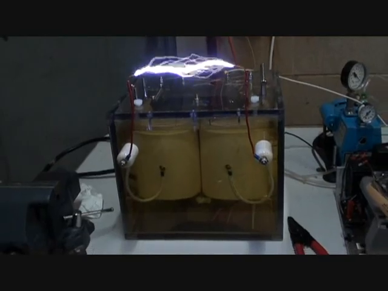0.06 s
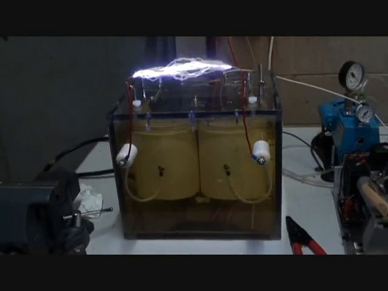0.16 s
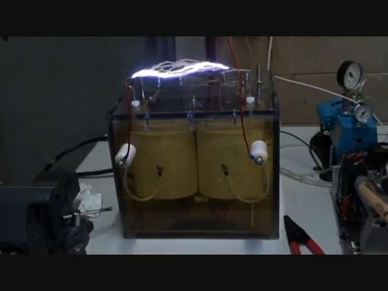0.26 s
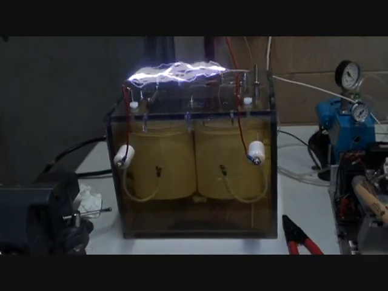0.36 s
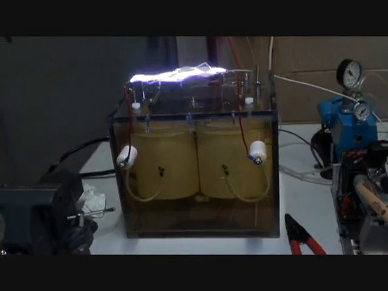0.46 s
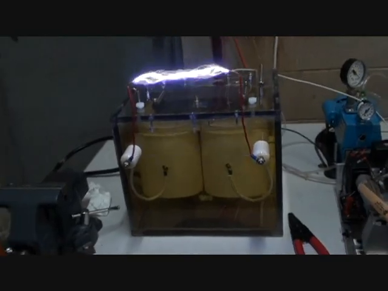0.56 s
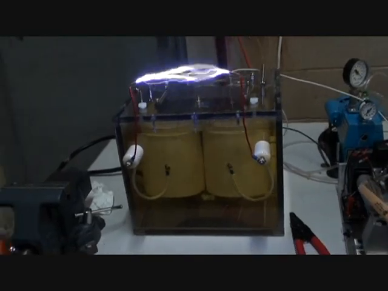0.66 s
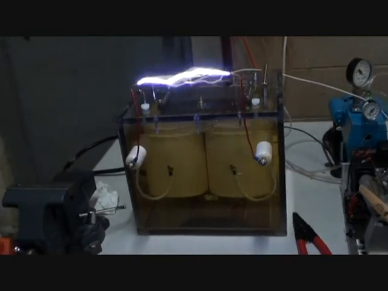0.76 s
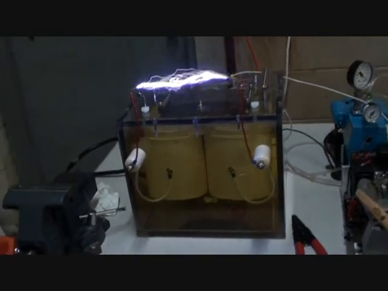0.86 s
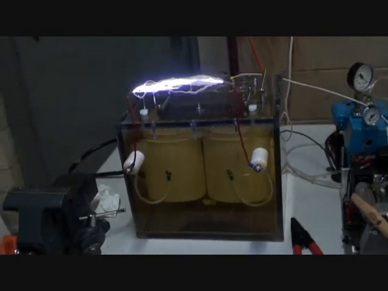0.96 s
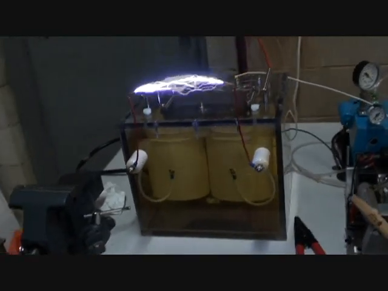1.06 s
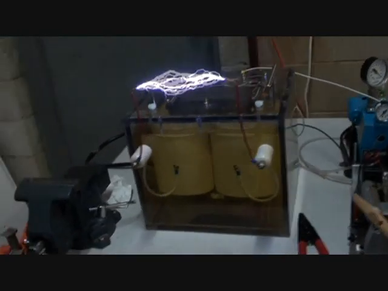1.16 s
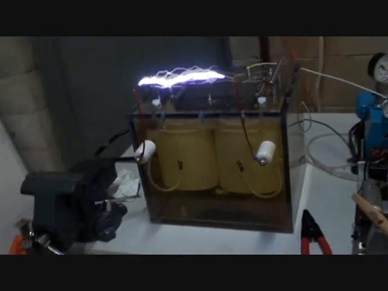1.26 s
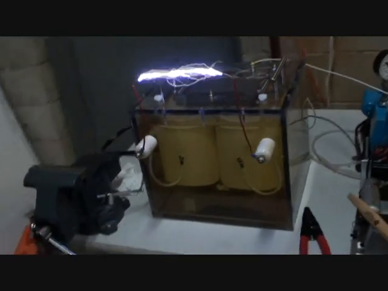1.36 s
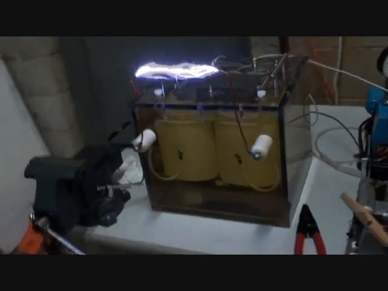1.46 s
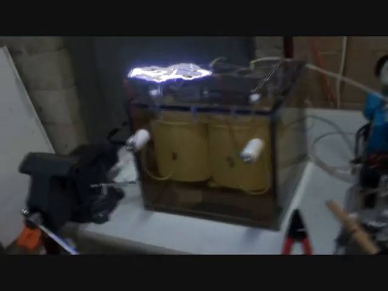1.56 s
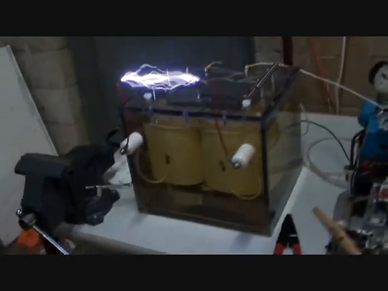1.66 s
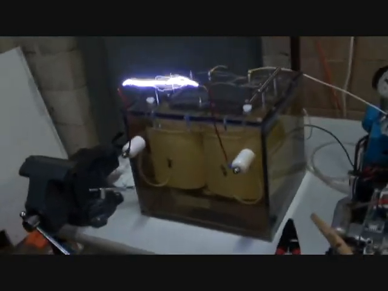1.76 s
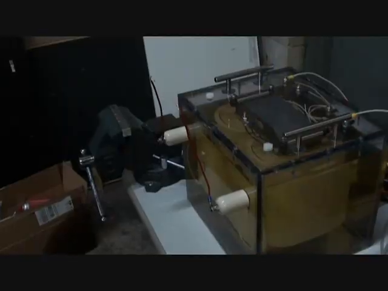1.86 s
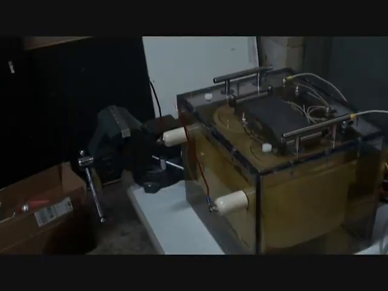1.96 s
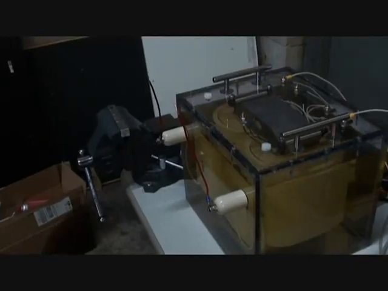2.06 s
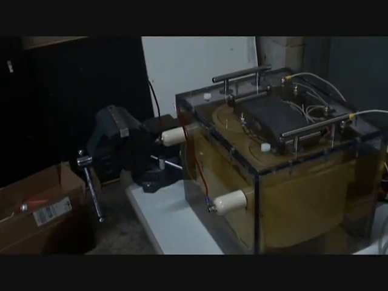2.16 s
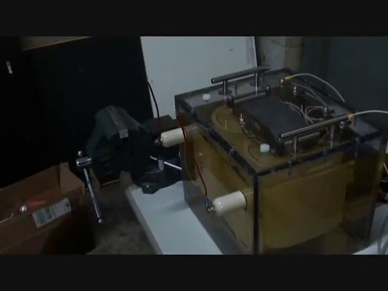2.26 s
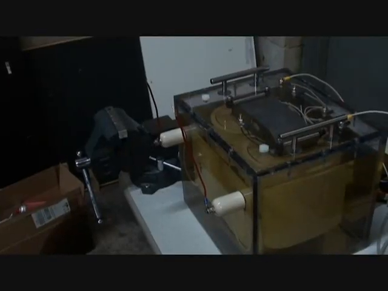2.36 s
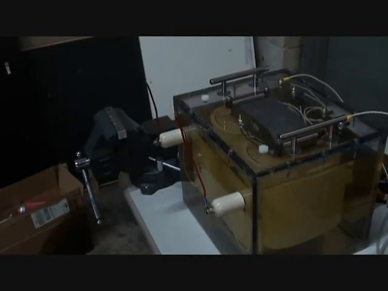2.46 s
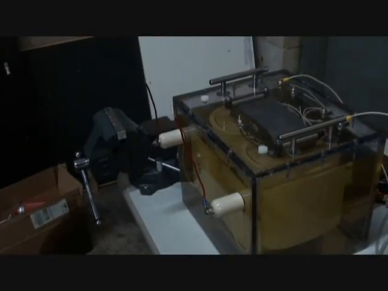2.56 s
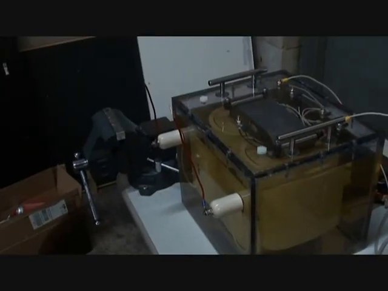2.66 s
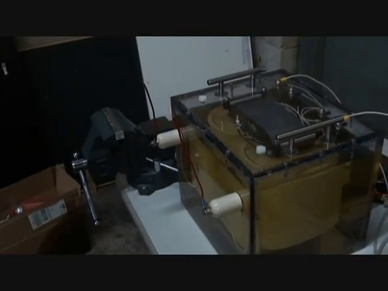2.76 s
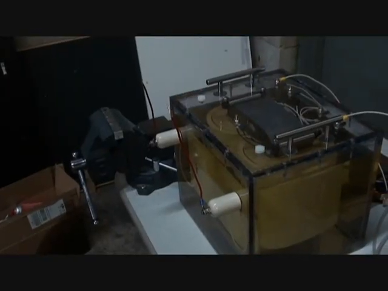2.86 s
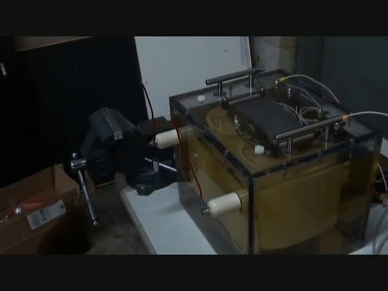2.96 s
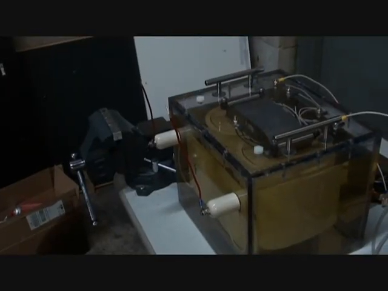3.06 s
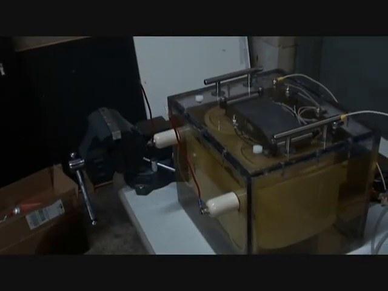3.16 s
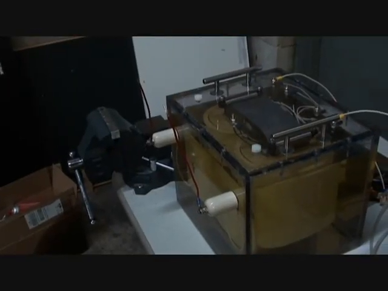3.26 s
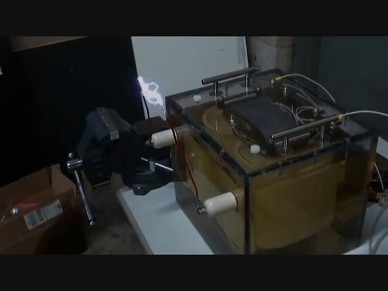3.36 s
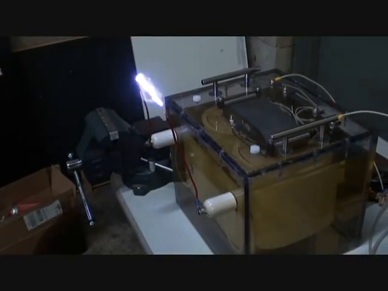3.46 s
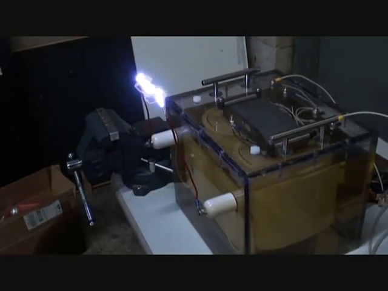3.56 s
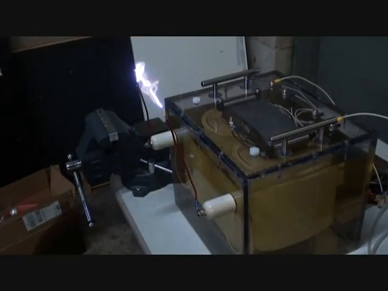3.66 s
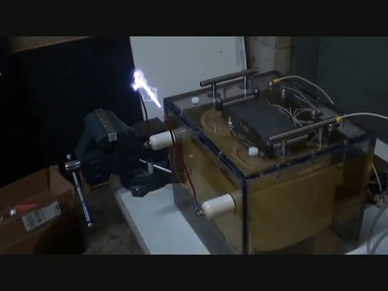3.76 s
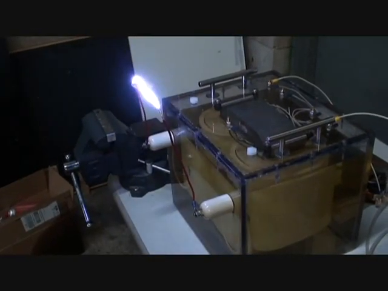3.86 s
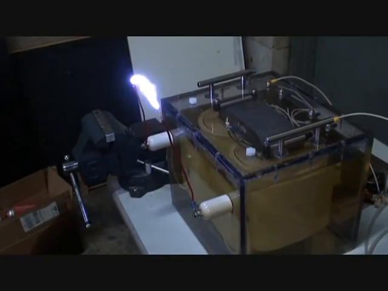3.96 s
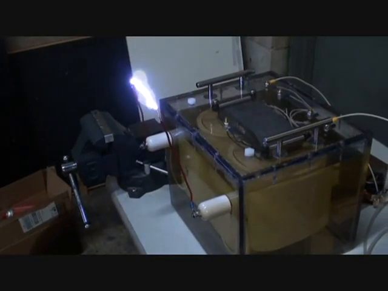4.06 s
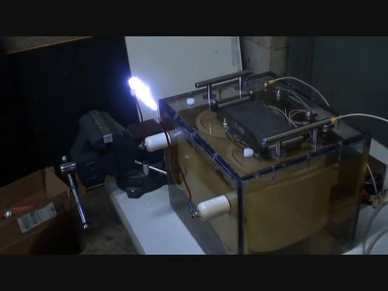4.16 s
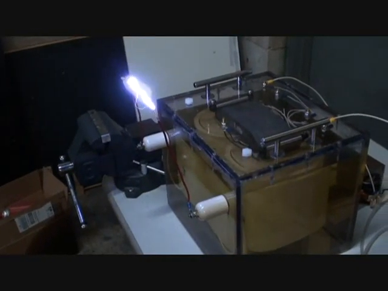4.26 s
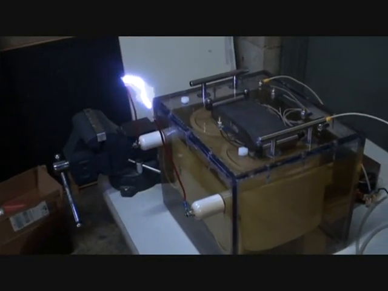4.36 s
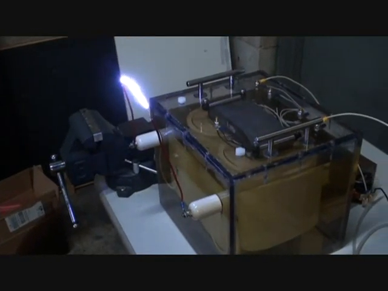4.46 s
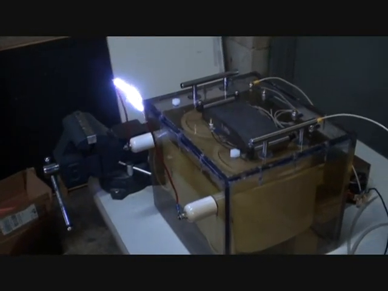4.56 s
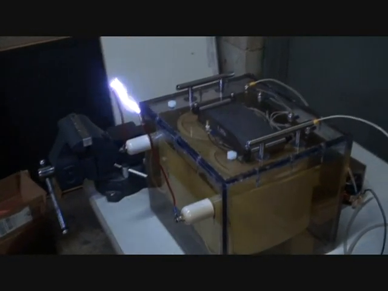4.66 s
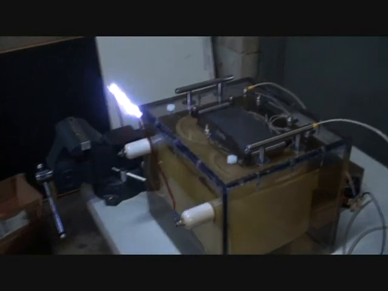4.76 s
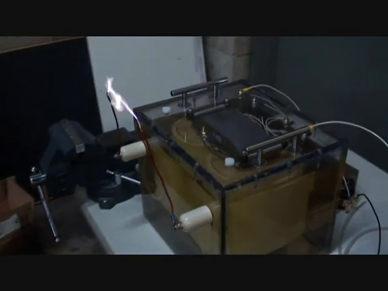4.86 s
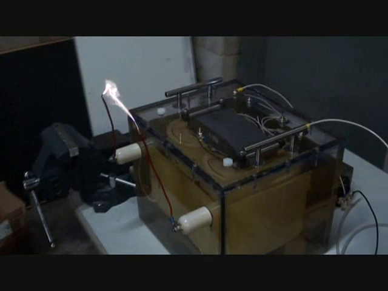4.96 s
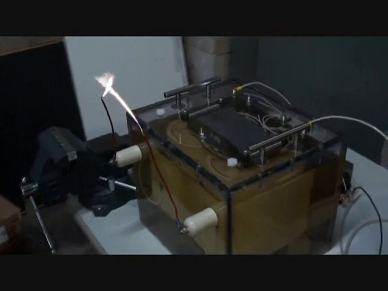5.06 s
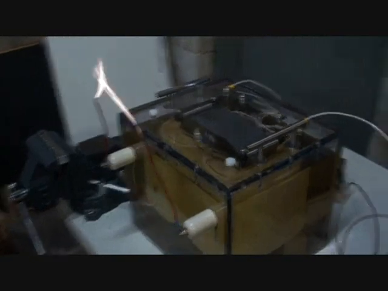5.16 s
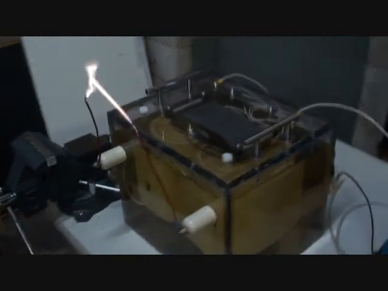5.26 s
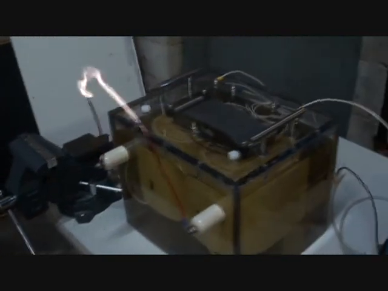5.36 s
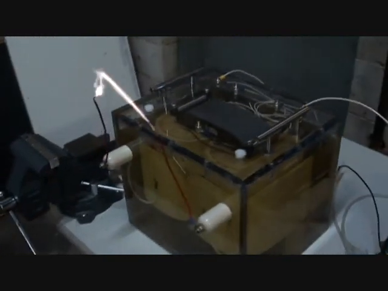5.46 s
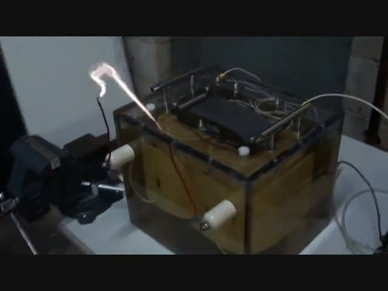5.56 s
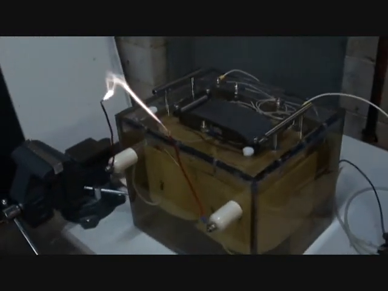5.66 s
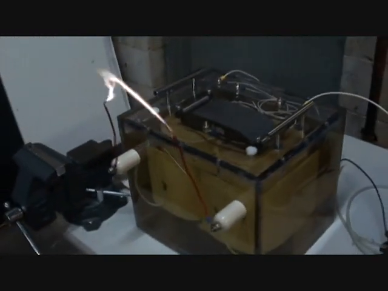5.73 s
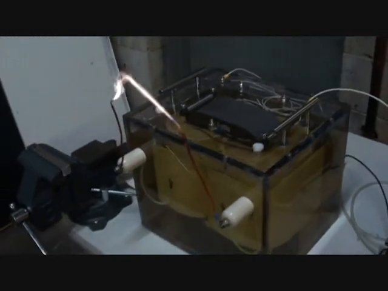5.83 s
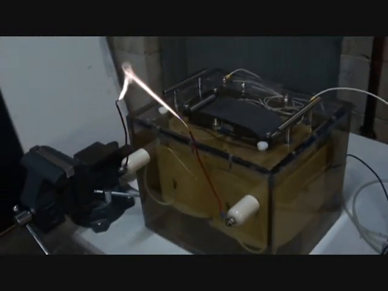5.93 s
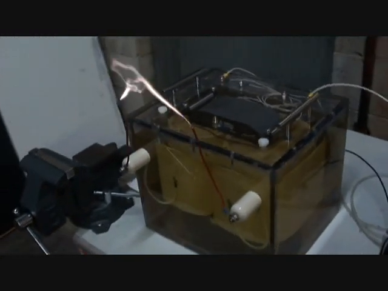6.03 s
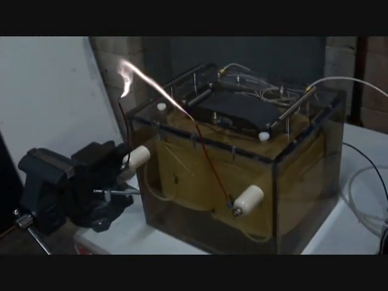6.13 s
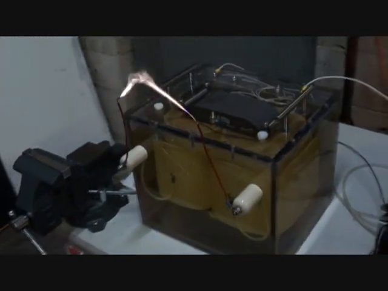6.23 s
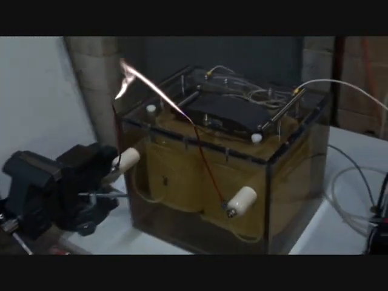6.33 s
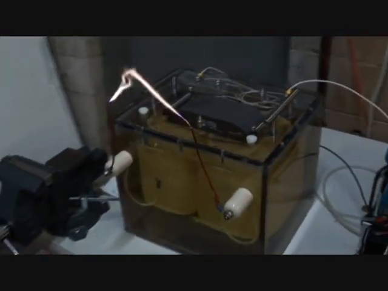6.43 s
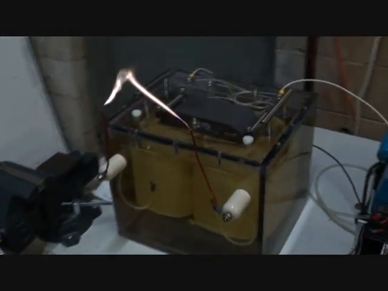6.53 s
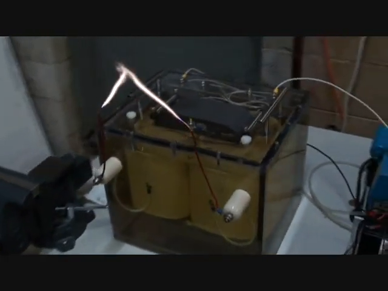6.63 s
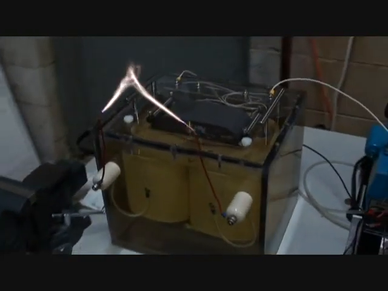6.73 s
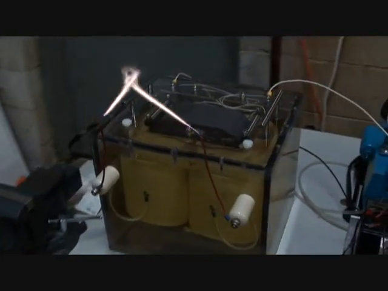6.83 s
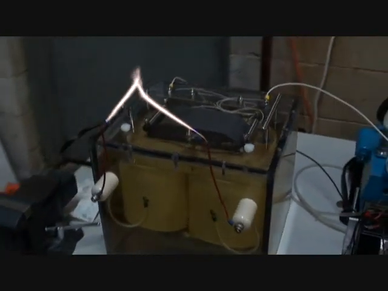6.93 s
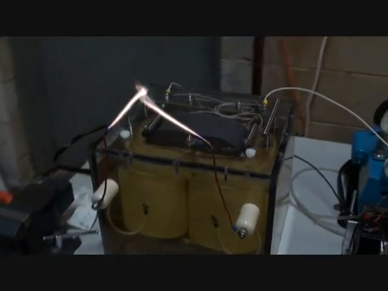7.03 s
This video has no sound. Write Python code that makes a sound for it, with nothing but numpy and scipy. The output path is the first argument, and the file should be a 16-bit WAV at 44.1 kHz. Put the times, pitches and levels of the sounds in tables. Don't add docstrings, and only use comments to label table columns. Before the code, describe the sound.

A harsh high-voltage arc buzzes with handling creaks, cuts to faint hiss and hum, then returns as a throbbing buzz settling into steady mains-rate snapping.

```python
import sys
import numpy as np
from scipy import signal
from scipy.fft import rfft, irfft, next_fast_len
from scipy.io import wavfile

SR = 44100
rng = np.random.default_rng(int(sys.argv[2]) if len(sys.argv) > 2 else 0)


def generate_wav(sig):
    pcm = np.round(np.clip(np.atleast_2d(sig).T, -1, 1) * 32767).astype(np.int16)
    wavfile.write(sys.argv[1], SR, pcm)


def makeup_ratio(level_db):
    decades = np.asarray(level_db, float) / 20
    return 10 ** decades


N = 312669
TIME, SIZE = np.arange(N) / SR, next_fast_len(N)
MAINS_HZ = 60.0
FLAME_LIGHTS_S, FLAME_LIT_S = 4.9, 5.01

CUTS = (1.9135, 3.4876)
# time_s, level_db
LONG_ARC = [
    (0.0, -10),
    (0.95, -12),
    (1.91, -14.5),
]
# time_s, level_db
CORONA = [
    (1.91, -33.5),
    (2.55, -31.5),
    (2.93, -27),
    (3.17, -28),
    (3.49, -28.5),
]
# time_s, level_db
SHORT_ARC = [
    (3.488, -13.5),
    (3.52, -15.5),
    (4.92, -17),
    (4.99, -31.5),
    (5.2, -49),
]
# time_s, level_db
FLAME = [(4.94, -38), (5.03, -41), (5.12, -44.5), (5.25, -42), (5.5, -39), (5.95, -38), (6.2, -34.5),
         (6.27, -31.5), (6.6, -30), (6.8, -28), (7.09, -27)]
# pitch_hz, level_db
LONG_COLOUR = [(410, -37.0), (700, -22), (1020, -20.5), (1160, -17), (1260, -16.0), (1950, -11),
               (3370, -11.5), (4090, -8), (5450, -8.0), (6450, -1.5), (7160, 2.5), (11700, -5),
               (15600, -16)][:-2] + [(16500, -11)]
# pitch_hz, level_db
CORONA_COLOUR = [(1180, -29.5), (2000, -15.0), (2950, -14.5), (3160, -14.0), (4320, -13.5), (5130, -14.5),
                 (7910, 0), (12300, -5.5), (15000, -8.5), (15800, -13)][:-2] + [(16500, -13.0)]
# pitch_hz, level_db
SHORT_COLOUR = [(350, -55), (600, -39), (652, -22), (768, -21.5), (834, -20), (997, -21), (1610, -15),
                (2870, -5.5), (5400, -7.5), (6400, 0), (7600, 3), (9360, 0.5), (11500, -3.5), (15100, -9.5),
                (16000, -12.5)]
# pitch_hz, level_db
FLAME_COLOUR = [(590, -56), (1000, -40), (1250, -23), (1560, -10), (2130, -11.5), (2600, -7), (3100, -9),
                (3750, -5), (4400, -10), (5000, -6.5), (5800, -5), (8260, 0), (16000, -20.5)]
# pitch_hz, level_db
RESTRIKE_COLOUR = [(1200, -19), (3000, -3), (3800, 0.5), (4400, 1.5), (5000, 3), (6000, -3), (8000, 0),
                   (11000, -1), (14000, 1)]
# pitch_hz, level_db
STREAMER_COLOUR = [(500, -30), (900, 5), (3500, -3), (8000, -4), (16000, -9)]
# mains_multiple, level_db
CORE_HUM = [
    [(2, 8), (4, -12)],
    [(1, -6), (2, -0.5), (3, -14), (4, 3.5), (5, -13), (6, -14)],
    [(1, -22.5), (2, -2), (3, -15.5), (4, 1), (5, -19), (6, -7), (7, -7.5), (8, -7), (9, -23), (10, -5),
     (11, -18), (12, -10.5), (13, -22), (14, -13.5), (15, -23), (16, -18.5), (17, -24), (18, -20),
     (19, -23), (20, -13), (21, -20), (22, -18), (24, -18), (26, -10), (28, -19), (30, -11), (32, -11)],
]
# hum_db, rumble_db, drift_db_per_s
BENCH = [
    (-59, -43.5, -6),
    (-50, -38, 1),
    (-60.5, -49.5, -3),
]
# pitch_hz, level_db
RUMBLE = [
    [(15, -55), (25, -37), (48, -23), (170, 1), (377, -2.5), (677, -6), (775, 0.5), (900, -7), (1170, -27),
     (1980, -120)],
    [(15, -43), (25, -27), (49, -8), (85, 1.5), (135, -1.5), (210, -13), (293, -1.5), (327, -8), (446, -6),
     (812, -8), (2060, -19.5), (2750, -23.5), (4580, -17.5), (5000, -16), (6500, -58), (11000, -120)],
    [(15, -36), (25, -38), (118, -7.5), (193, -18.0), (350, -10.0), (423, -11.0), (599, -7.5), (800, -15),
     (1040, -7), (1760, -120)][:-2] + [(1000, -16), (1500, -14), (2200, -25.5)],
]
# pitch_hz, width_hz, level_db
FAN = [(121, 8, -6), (148.4, 5.7, 3.5), (184, 18, -1.5), (353, 15, -6)]
# start_s, peak_db
KNOCKS = [(0.21, -21), (0.232, -41), (0.258, -28), (0.282, -27), (0.309, -18.5), (0.318, -15.5),
          (0.334, -27), (0.343, -22), (0.377, -30), (0.392, -40), (0.427, -20), (0.459, -25), (0.491, -30),
          (0.567, -34), (0.626, -19.5), (0.643, -26), (0.692, -27), (0.727, -26.5), (0.799, -36),
          (0.857, -30), (1.085, -29)]
# pitch_hz, fade_by_60_db_s
ROOM = [(200, 0.33), (2000, 1), (8000, 0.84), (11500, 0.48), (15000, 0.26)]
# pitch_hz, side_against_mid_db
WIDTH = [(60, -23), (92, -23), (140, -44), (210, -7), (330, -13.5), (500, -6), (770, -9), (1170, -8.5),
         (1790, -17), (2740, -14), (4190, -9), (6410, -14.5), (9810, -16), (15000, -19)]
# mains_multiple, level_db
LONG_TONES = [(19.1, -58), (20, -52), (22.04, -53), (16.7, -67), (13, -66)]
# mains_multiple, level_db
SHORT_LOAD = [(6, -67), (11, -68), (13, -57.5), (15, -60), (17, -54.5), (19, -55.5)]
# crest_s, width_s, level_db
JUMPS = [
    (0.39, 0.22, -1.4),
    (1.16, 0.049, -0.5),
    (1.29, 0.1, -0.5),
    (1.46, 0.09, 2),
    (3.29, 0.031, 0.5),
    (3.43, 0.044, 0),
    (3.75, 0.074, -2.5),
    (4.15, 0.067, -2.5),
    (4.81, 0.044, -2.3),
    (4.9, 0.033, 2),
]
# start_s, length_s, strength_db
SPUTTERS = [(4.95, 0.12, 3), (5.466, 0.047, 6.5), (5.54, 0.042, 8), (5.687, 0.017, 9), (5.727, 0.016, 12.5),
            (5.873, 0.027, 2), (5.97, 0.074, 8.5), (6.134, .012, 13), (6.248, 0.018, 13),
            (6.287, 0.022, 12.5), (6.478, .015, 10), (6.547, 0.02, 11.5), (6.66, .01, 5.5),
            (6.746, .01, 11), (6.816, .004, 8), (6.837, 0.01, 12.5), (6.966, .01, 3), (7.037, 0.018, 9)]
# crest_s, width_s, level_db
FLARES = [
    (4.978, .004, 4),
    (5.011, .004, 4),
    (5.0436, 0.0036, 12),
    (5.0605, 0.0035, 12),
    (5.069, .004, 9),
    (5.077, .006, 3),
    (5.091, 0.0059, 16),
    (5.136, .004, 5),
    (5.994, 0.015, 2.5),
]
# crest_s, width_s, level_db
BEAMS = [(5.15, .03, 9), (5.22, .015, 6), (5.4, .03, 1), (5.47, .012, 13), (5.505, .012, 13),
         (5.57, .015, 5), (5.65, .015, 8), (5.74, .012, 2), (5.79, .012, 9), (5.98, .012, 0),
         (6.095, .012, 7), (6.2, .02, 6), (6.335, .008, -7), (6.36, .01, 9)]
# start_s, peak_db
STREAMERS = [(2.83, -30), (2.8784, -29), (2.955, -27), (3.037, -27.5), (3.071, -23), (3.1038, -22),
             (3.169, -32), (3.2036, -29.5), (3.235, -26), (3.2707, -22), (3.2873, -25), (3.3357, -32.5),
             (3.3862, -22.5)]
# delay_ms, drift_ms_per_s, level_db, change_from_s, change_db_per_s
LONG_PATHS = [(0.463, 0, -24.5, 1.2, 21), (5.05, 0.098, -12.5, 0, 0.5), (3.17, 0.09, -21.5, 0, -3.5),
              (1.226, 0.023, -16, 0, -13)]
# delay_ms, drift_ms_per_s, level_db, change_from_s, change_db_per_s
SHORT_PATHS = [(0.418, 0.0097, -9.5, 3.2, -11), (3, 0.015, -13, 3.5, -2), (0.614, 0, -25, 3.5, -3)]
# delay_ms, drift_ms_per_s
FLAME_DELAYS = [(5.37, .36), (5.58, 0), (.77, .05), (.85, .33), (1.55, .1), (1.79, .12), (2.38, 0),
                (2.7, .08), (2.9, .1), (.35, 0)]
# level_db, change_from_s, change_db_per_s
FLAME_ECHOES = [(-2.5, 5.7, -6.5), (-19, 5.6, -6), (-8, 4.3, -12), (-9, 5.7, -20), (-14.5, 6, -15),
                (-9.5, 5.4, -8.5), (-8, 5.6, -17), (-15, 4.1, -4), (-14, 5.8, -21), (-19.5, 5.1, 1)]
# time_s, half_cycle_share
LONG_STRIKES = [(0, 0.49), (.5, 0.53), (1., 0.59), (1.25, .53), (1.4, .56), (1.91, 0.5)]
# time_s, half_cycle_share
SHORT_STRIKES = [(3.49, .58), (5., .55)]
# time_s, half_cycle_share
FLAME_STRIKES = [(4.95, .26), (5.1, .225), (5.25, .187), (5.5, .176), (5.9, .175), (6.2, .183), (6.5, .179),
                 (7.09, .165)]
# time_s, depth_db
THROB = [(3.49, 2), (3.68, 3), (3.73, 9), (3.8, 8), (3.87, 4), (4.1, 3.5), (4.3, 2), (4.75, 3), (4.82, 6),
         (4.88, 3), (4.98, 9)]


def evened(x):
    return x / np.sqrt(np.mean(x ** 2) + 1e-20)


def read(points, hz):
    f, value = np.transpose(points)
    return np.interp(np.log(hz + 1), np.log(f + 1), value)


def columns(rows):
    s, *values = np.transpose(rows)
    return [np.interp(TIME, s, v) for v in values]


def bumps(events):
    return sum(np.interp(TIME, [s - 2.0 * width, s, s + 1.7 * width], [0, db, 0])
               for s, width, db in events)


def coloured(x, points, causal=0.92):
    size = 2048
    gain_db = read(points, abs(np.fft.fftfreq(size, 1 / SR)))
    log_gain = np.log(makeup_ratio(np.maximum(gain_db, -90)))
    phase = causal * signal.hilbert(log_gain).imag
    pulse = np.fft.ifft(np.exp(log_gain - 1j * phase)).real
    return signal.oaconvolve(x, np.fft.fftshift(pulse), "same")


def tail():
    taps = np.zeros(SR)
    at = np.arange(60, SR - 12, 12)
    taps[at + rng.integers(0, 12, len(at))] = rng.choice([-1., 1.], len(at))
    hz, t, z = signal.stft(taps, SR, nperseg=256)
    fading = z * makeup_ratio(-60 * t / read(ROOM, hz)[:, None])
    taps = signal.istft(fading, SR, nperseg=256)[1][:SR]
    return taps / np.linalg.norm(taps)


def room(x, wet_db, side_db=5.0, left_db=-45, turns_per_s=0.698, nearing_db_per_s=0.):
    first, last = np.flatnonzero(x)[[0, -1]]
    out = x * makeup_ratio([[0], [left_db]])
    nearing = makeup_ratio(-nearing_db_per_s * (TIME - TIME[first]))
    for walk in (np.cos, np.sin):
        mid_tail = makeup_ratio(wet_db) * tail()
        side_tail = makeup_ratio(side_db) * coloured(tail(), WIDTH, causal=0)
        fed = x * nearing * walk(2 * np.pi * turns_per_s * TIME)
        tails = np.array([mid_tail, side_tail])
        wet = signal.fftconvolve(fed[None, first:last], tails, axes=1)[:, :N - first]
        out[:, first:first + wet.shape[1]] += wet
    return out / np.sqrt(1 + makeup_ratio(2 * wet_db))


def bounced(x, paths, since_s, until_s, dull_hz=10000, small_hz=1100):
    span = slice(round(since_s * SR), round(until_s * SR))
    out, t = x.copy(), TIME[span]
    dull = signal.filtfilt(*signal.butter(1, [small_hz, dull_hz], "band", fs=SR), x[span])
    for delay_ms, drift, db, from_s, db_per_s in paths:
        delay_s = (delay_ms + drift * (t - since_s)) / 1000
        strength = makeup_ratio(db + db_per_s * (t - from_s).clip(0))
        out[span] += strength * np.interp(t - delay_s, t, dull, left=0)
    return out


def sparks(start, duty, per_s, uneven, spread_db, flicker_db, lopsided_db, length_m,
           swell=0., wander=0., count=40):
    half = np.arange(-1, int(2 * MAINS_HZ * N / SR) + 1)[:, None]
    wait, size = rng.standard_normal((len(half), count, 2)).transpose(2, 0, 1)
    wait = 2 * MAINS_HZ / per_s * np.exp(uneven * wait)
    phase = np.cumsum(wait, axis=1) - wait[:, :1] * .9
    path_db = flicker_db * rng.standard_normal((len(half), 1)).clip(-2.5, 1.6)
    size_db = spread_db * size.clip(-3, 1.6) + path_db + lopsided_db * (half % 2)
    size = makeup_ratio(size_db) * (phase < duty)
    size *= abs(np.sin(np.pi * (0.21 + 0.76 * phase / duty))) ** swell
    place, share = rng.random((len(half), count, 3, 2)).transpose(3, 2, 0, 1)
    strike = np.interp(half / (2 * MAINS_HZ), *np.transpose(start))
    strike = strike + wander * rng.standard_normal((len(half), 1))
    s = (half + strike + phase) / (2 * MAINS_HZ) + place * length_m / 343
    at = np.round(s * SR).astype(int)
    inside = (at >= 0) & (at < N)
    return -evened(np.bincount(at[inside], (size * (0.84 + share))[inside], N))


def arc(rows, colour, train, wet_db, side_db):
    burning = (TIME >= rows[0][0] - .001) * (TIME < rows[-1][0] + .01)
    level = makeup_ratio(columns(rows)[0] + bumps(JUMPS)) * burning
    return room(level * evened(coloured(train, colour)), wet_db, side_db)


def long_arc():
    train = sparks(start=LONG_STRIKES, duty=.79, per_s=1250, uneven=.22, spread_db=0.0, flicker_db=1.5,
                   lopsided_db=-2.3, length_m=.2, swell=0.49)
    train = bounced(train, LONG_PATHS, 0, CUTS[0])
    out = arc([(-1, -14), *LONG_ARC], LONG_COLOUR, train, wet_db=-8.0, side_db=-1.5)
    return out * (TIME < CUTS[0])


def bench_levels():
    shot = np.searchsorted(CUTS, TIME)
    hum_db, rumble_db, drift = np.transpose(BENCH)[:, shot]
    drift_db = drift * (TIME - np.array([0, *CUTS])[shot])
    supply_db = (columns(CORONA)[0] - CORONA[1][1]).clip(0)
    hum_db = hum_db + drift_db + (shot == 1) * 2.5 * supply_db
    lit = np.interp(TIME, [FLAME_LIGHTS_S, FLAME_LIT_S], [0, 1])
    since = TIME - FLAME_LIT_S
    return ((1 - lit) * hum_db + lit * (-46 + 0.84 * since),
            (1 - lit) * (rumble_db + drift_db) + lit * (-59 + 2.5 * since))


def bench():
    hum_db, rumble_db = bench_levels()
    hz, shot = np.fft.rfftfreq(SIZE, 1 / SR), np.searchsorted(CUTS, TIME)
    noise = rfft(rng.standard_normal((2, N)), SIZE) * makeup_ratio([0 * hz, read(WIDTH, hz)])
    fan = sum(makeup_ratio(db) / (1 + (2 * (hz - f) / w) ** 2) for f, w, db in FAN)
    motor = makeup_ratio(-47.5) * np.sqrt(2) * np.sin(2 * np.pi * 59.1 * TIME)
    out = np.zeros((2, N))
    for k in range(3):
        hum = sum(makeup_ratio(db) * np.sin(2 * np.pi * (m * MAINS_HZ * TIME + rng.random()))
                  for m, db in CORE_HUM[k])
        rumble = irfft((makeup_ratio(read(RUMBLE[k], hz)) + (k == 1) * fan) * noise, SIZE)[:, :N]
        rumble = makeup_ratio(rumble_db) * rumble / np.std(rumble[0])
        rumble[0] += (k == 1) * motor
        out += (shot == k) * (rumble + makeup_ratio(hum_db) * evened(hum) * makeup_ratio([[0], [-22]]))
    return out


def knocks():
    out, t = np.zeros(N), np.arange(900) / SR
    u = 2 * np.pi * 203 * t
    swing = 0.5 * np.cos(u) * np.exp(-.3 * u)
    push = (1 - np.exp(-t / 0.00008)) * (swing + 1.54 * np.exp(-t / 0.00056))
    for s, db in KNOCKS:
        out[round((s + .0007) * SR):][:len(t)] += makeup_ratio(db + 1.5) * push
    out = signal.lfilter(*signal.butter(1, 90, "high", fs=SR), out)
    return out * makeup_ratio([[0], [-26]])


def arc_tones(lines, on_s, waver_db):
    hum = sum(makeup_ratio(db + 3) * np.sin(2 * np.pi * (m * MAINS_HZ * TIME + rng.random())) for m, db in lines)
    slow = evened(np.interp(TIME, np.arange(0, 8, .05), rng.standard_normal(160)))
    return hum * np.interp(TIME, on_s, [0, 1, 1, 0]) * makeup_ratio(waver_db * slow) * makeup_ratio([[0], [-12]])


def corona():
    train = sparks(start=[(0, 0.21)], duty=0.63, per_s=4000, uneven=.5, spread_db=1.5, flicker_db=0.0,
                   lopsided_db=-3.0, length_m=.3, swell=0.38)
    return arc([(1.3, -19), *CORONA], CORONA_COLOUR, train, wet_db=-7.0, side_db=2.5)


def streamers():
    out, t = np.zeros(N), np.arange(300) / SR
    for s, db in STREAMERS:
        burst = rng.standard_normal(len(t)) * np.exp(-t / 0.0018)
        out[round(s * SR):][:len(t)] += makeup_ratio(db + 4.5) * burst
    return coloured(out, STREAMER_COLOUR) * makeup_ratio([[0], [-24]])


def short_arc():
    train = sparks(start=SHORT_STRIKES, wander=.06, duty=0.94, per_s=1300, uneven=.35, spread_db=3.5,
                   flicker_db=1.36, lopsided_db=-0.5, length_m=.15)
    throb = np.cos(2 * np.pi * (2 * MAINS_HZ * TIME - 0.69))
    train = train * makeup_ratio(columns(THROB)[0] * throb)
    train = bounced(train, SHORT_PATHS, CUTS[1], FLAME[4][0])
    return arc(SHORT_ARC, SHORT_COLOUR, train, wet_db=-5.0, side_db=3.0)


def flame_state():
    rise_s, fall_s = 0.0074, 0.0099
    length_db = columns(FLAME)[0]
    grown_db = np.maximum(length_db - FLAME[5][1], 0)
    sputter_db = sum(np.interp(TIME, [s - rise_s, s, s + hold, s + hold + fall_s], [0, db, db, 0])
                     for s, hold, db in SPUTTERS)
    facing = .5 + .5 * np.tanh((TIME - 6.43) / 0.18)
    level_db = length_db + bumps(FLARES) + 0.086 * sputter_db
    restrike_db = -9 - 0.86 * grown_db + sputter_db
    treble_db = -0.22 * grown_db + 12.5 * facing + 0.25 * sputter_db * (1 - facing) + bumps(BEAMS)
    return level_db, restrike_db, treble_db


def flame():
    level_db, restrike_db, treble_db = flame_state()
    snaps = sparks(start=FLAME_STRIKES, wander=.0012, duty=0.026, per_s=1100, uneven=0.32,
                   spread_db=-1.3, flicker_db=0.9, lopsided_db=1.5, length_m=0.00033)
    restrikes = sparks(start=np.add(FLAME_STRIKES, [0, .015]), duty=0.074, per_s=4600, uneven=0.22,
                       spread_db=3.5, flicker_db=1.0, lopsided_db=-4.5, length_m=0.0048)
    both = snaps + makeup_ratio(restrike_db) * coloured(restrikes, RESTRIKE_COLOUR)
    drive = evened(coloured(both, FLAME_COLOUR))
    top = coloured(drive, [(7000, -40), (10000, -6), (12000, 0)], causal=0)
    drive = drive + (makeup_ratio(treble_db) - 1) * top
    drive = makeup_ratio(level_db + 1.0) * drive * (TIME > FLAME[0][0])
    paths = np.hstack([FLAME_DELAYS, FLAME_ECHOES])
    drive = bounced(drive, paths, FLAME[0][0], N / SR, dull_hz=15200)
    return room(drive, wet_db=-4.0, left_db=-18.0, turns_per_s=0.552, nearing_db_per_s=3.0)


def scene():
    first = long_arc()
    second = (corona() + streamers()) * (TIME >= CUTS[0]) * (TIME < CUTS[1])
    third = short_arc() + flame()
    core = arc_tones(LONG_TONES, (.6, 1.4, 1.9, CUTS[0]), waver_db=4.0)
    core = core + arc_tones(SHORT_LOAD, (CUTS[1], 3.52, 4.9, 5.), waver_db=2.5)
    mid, side = first + second + third + bench() + knocks() + core
    return np.array([mid + side, mid - side])


def top_cut(x):
    return signal.sosfilt(signal.butter(12, 16280, fs=SR, output="sos"), x)


def record(dry):
    squash = .5 * np.tanh(dry / .5) - dry
    limited = dry + signal.lfilter(*signal.butter(1, 500, "high", fs=SR), squash)
    low_pass = signal.firwin(255, 15950, window=("kaiser", 9), fs=SR)
    limited = signal.oaconvolve(limited, low_pass[None], "same")
    return top_cut(limited)


dry = scene()
out = record(dry)
generate_wav(out)
```